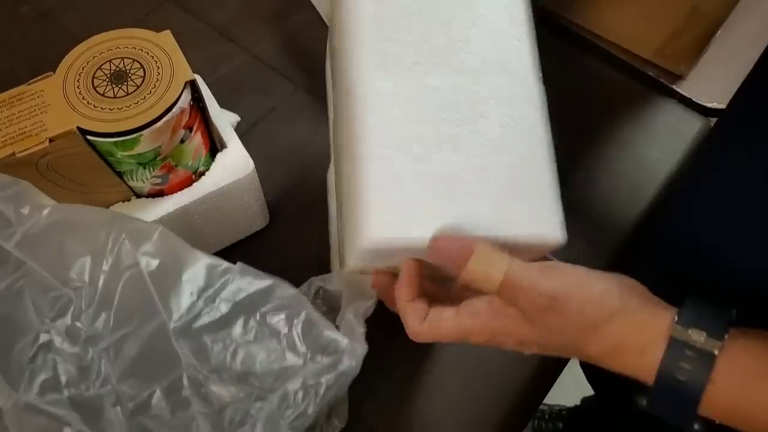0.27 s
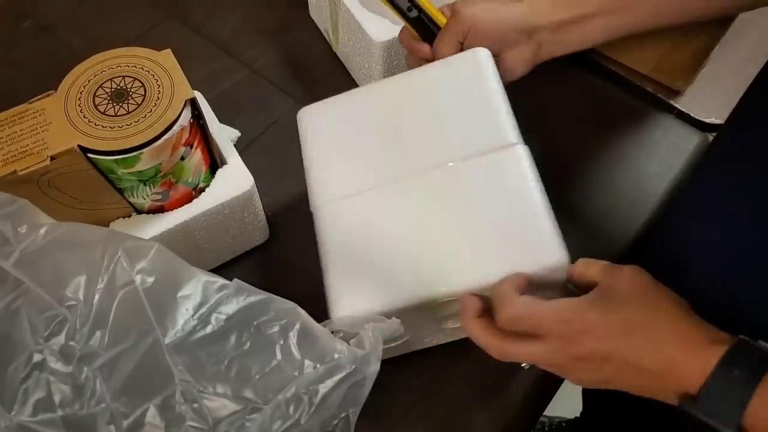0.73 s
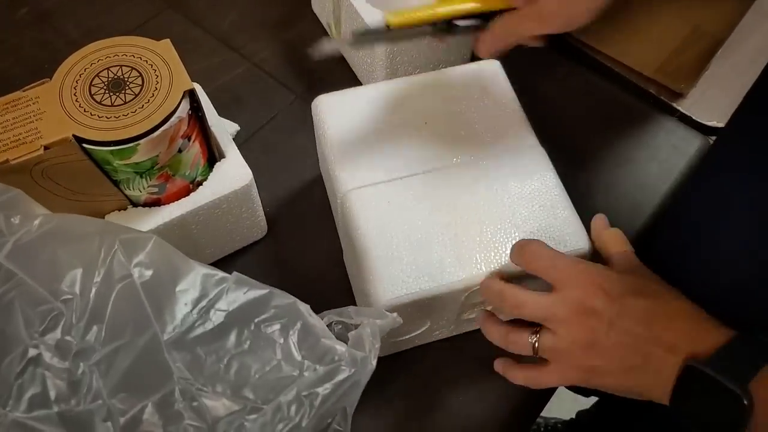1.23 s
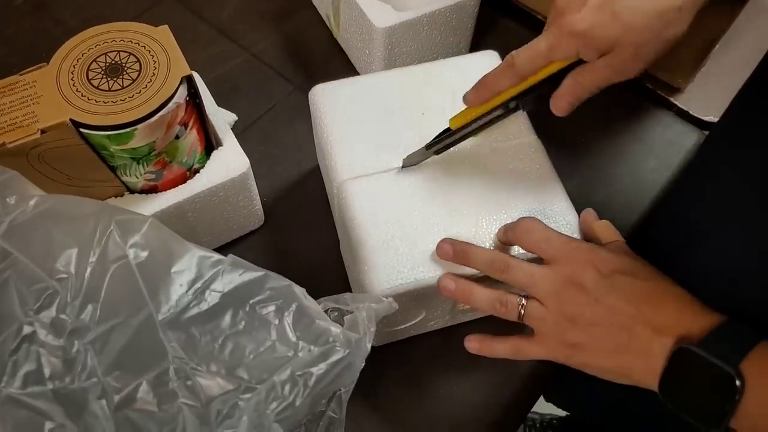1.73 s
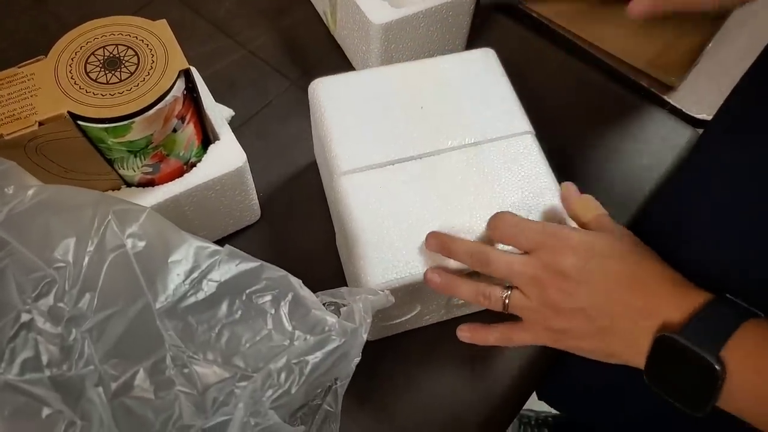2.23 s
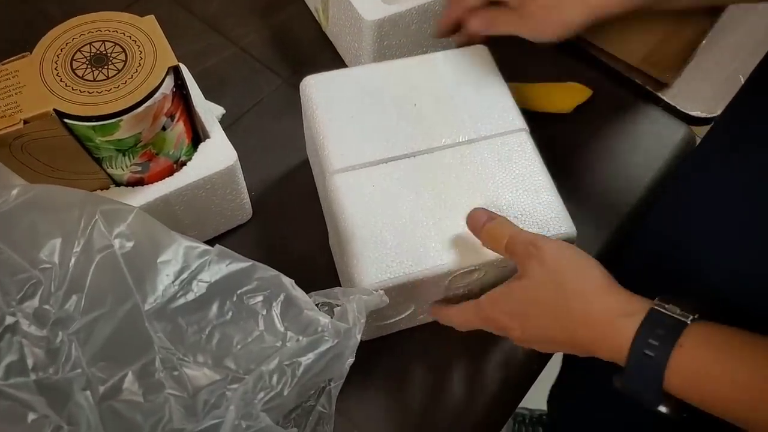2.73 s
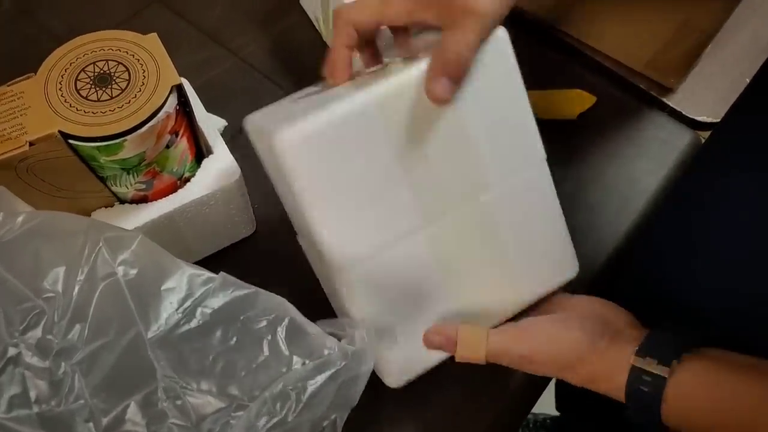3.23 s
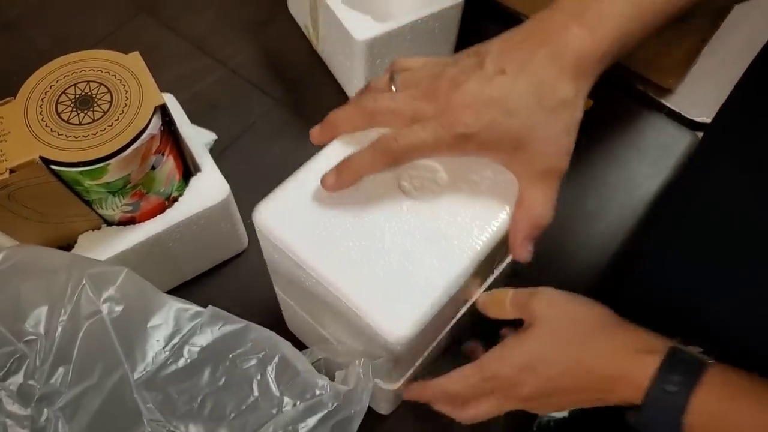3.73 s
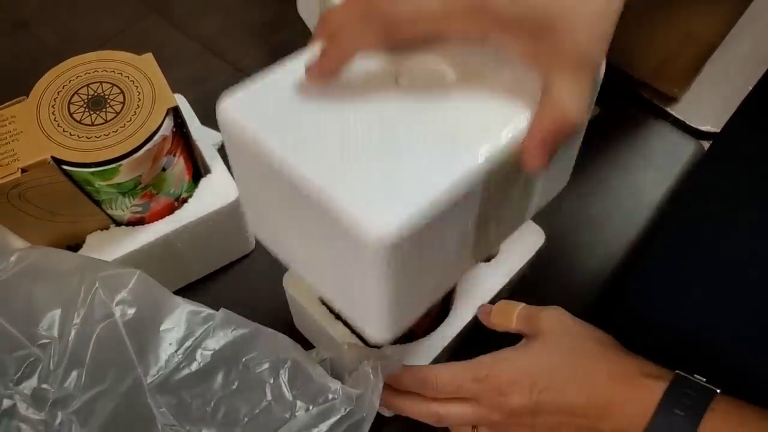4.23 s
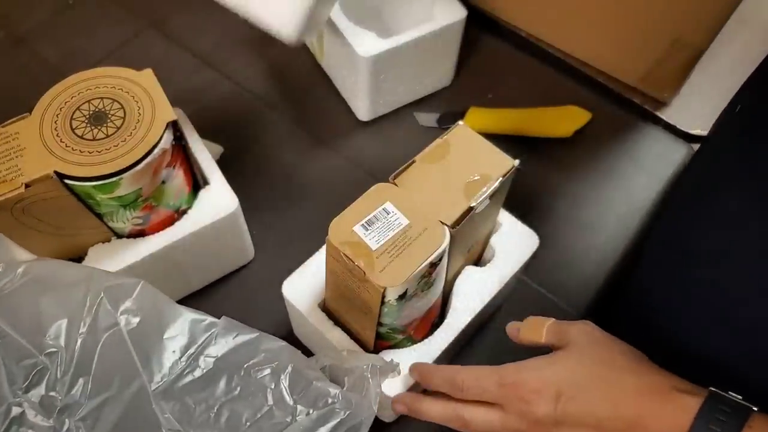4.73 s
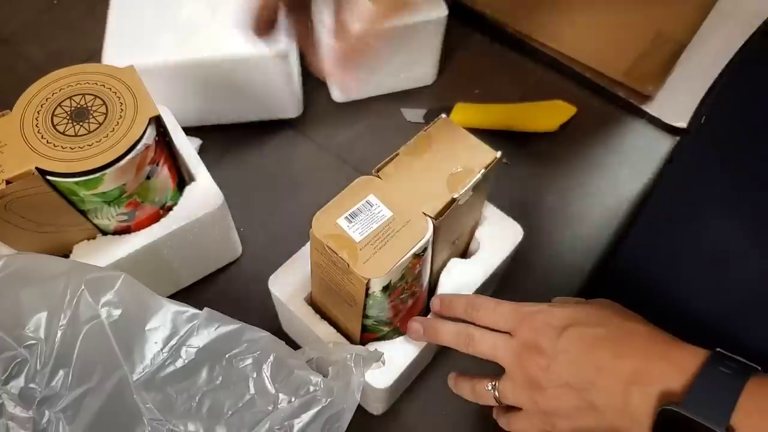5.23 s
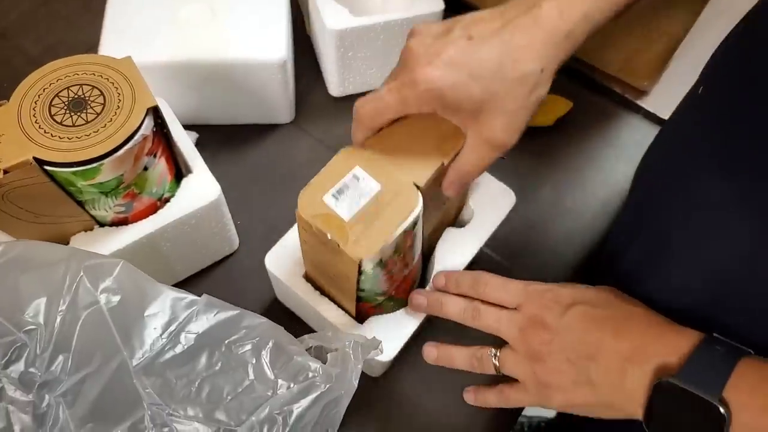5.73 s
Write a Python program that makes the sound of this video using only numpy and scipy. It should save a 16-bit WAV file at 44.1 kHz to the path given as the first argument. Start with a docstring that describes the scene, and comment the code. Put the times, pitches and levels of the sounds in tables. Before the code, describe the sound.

An unboxing heard near the microphones, slightly to the left, with a short dry room tail and faint steady room tone. Gritty foam scraping and a small chirp come first, then tiny cutting clicks, a bump and a clattering knife. Quieter fizzing rubs lead to two strong snaps as the lid opens, a quieter pause, loud hollow knocks, and finally light sliding rasps.

```python
"""A hand rubs foam with a swelling rasp, then tiny snaps: a polystyrene packing box is unpacked in a small room.
Rasp and snaps are resonant noise in three registers; squeaks, chirps and one knife ring are gliding tones.
Knocks ring the hollow box's modes and boom the table; a knife nicks the tape, drops, and its blade rings high.
At the end the lid is set down and a carton slides out of the lower half."""
import sys
import numpy as np
from scipy import signal
from scipy.fft import rfft, irfft
from scipy.io import wavfile
from scipy.ndimage import map_coordinates

SR = 44100
rng = np.random.default_rng(int(sys.argv[2]) if len(sys.argv) > 2 else 0)


def transcribe(signal):
    """Save signal, clipped to [-1, 1], as a 16-bit WAV file at the path in sys.argv[1]."""
    frames = np.atleast_2d(signal).T
    limited = np.clip(frames, -1, 1)
    pcm = np.round(limited * 32767).astype(np.int16)
    wavfile.write(sys.argv[1], SR, pcm)


N = 263935
TIME_S = np.arange(N) / SR


def from_db(db):
    """Decibels to amplitude gain."""
    return 10 ** (np.asarray(db) / 20)


def rms_one(x):
    """Scale to rms 1."""
    return x / np.sqrt(np.mean(x ** 2) + 1e-20)


def low_pass(x, hz, order=2):
    """Causal Butterworth low-pass."""
    return signal.sosfilt(signal.butter(order, np.clip(hz, 10, .45 * SR), fs=SR, output="sos"), x)


def high_pass_sos(hz, order=2):
    """Butterworth high-pass sections."""
    return signal.butter(order, hz, "high", fs=SR, output="sos")


def drift(rate_hz):
    """Smooth random signal of rms 1; the first second is dropped to let the filter settle."""
    return rms_one(low_pass(rng.standard_normal(N + SR), rate_hz)[SR:])


def colour(x, spectrum, size=2048):
    """Minimum-phase filter with the given spectrum; white noise keeps its power."""
    hz, db = np.transpose(spectrum)
    points = np.log2(hz)
    octave = np.log2(np.maximum(np.arange(size // 2 + 1) * SR / size, 10))
    outside = np.abs(octave - np.clip(octave, points[0], points[-1]))
    gain_db = np.interp(octave, points, db) - 20 * outside  # 20 dB per octave beyond the end points
    cepstrum = irfft(np.log(from_db(gain_db)))
    # folding the cepstrum onto positive time makes the phase minimal
    cepstrum[1:size // 2] *= 2
    cepstrum[size // 2 + 1:] = 0
    response = irfft(np.exp(rfft(cepstrum)))
    return signal.oaconvolve(x, response[None] / np.linalg.norm(response), axes=1)[:, :N]


def stereo_noise(alike, size):
    """White noise at two ears; alike is the shared share of power."""
    alike = np.clip(alike, 0, 1)
    shared = np.sqrt(alike) * rng.standard_normal(size)
    return shared + np.sqrt(1 - alike) * rng.standard_normal((2, size))


def panned(balance_db):
    """Left and right gains of constant power; balance is left minus right."""
    gains = from_db(np.array([[.5], [-.5]]) * balance_db)
    return gains / np.sqrt(np.mean(gains ** 2, axis=0))


def add(track, s, sound):
    """Mix a sound in at time s."""
    start = max(round(s * SR), 0)
    track[..., start:start + sound.shape[-1]] += sound[..., :N - start]


# quiet room spectrum: (frequency [Hz], relative density [dB per Hz])
ROOM_TONE = [(25, 16.5), (45, 5), (100, -4.5), (250, -19), (800, -33.5), (2500, -23), (7000, -38),
             (12000, -31), (16000, -27.5)]
ROOM_TONE_DB = -51.5


def room_tone():
    """Steady noise of the quiet room, partly shared by the ears."""
    return from_db(ROOM_TONE_DB) * colour(stereo_noise(0.69, N), ROOM_TONE)


def room(x, t60_s, wet_db, gap_s=0.0087, wall_hz=9000, bass_hz=260, size=22050):
    """A short diffuse tail, duller than the direct sound and alike at both ears in the bass."""
    t, noise = TIME_S[:size], rng.standard_normal((2, size))
    side = signal.sosfilt(high_pass_sos(bass_hz), (noise[0] - noise[1]) / 2)
    stereo = noise.mean(axis=0) + side * [[1], [-1]]
    tail = stereo * from_db(-60 * t / t60_s) * (t > gap_s)
    tail = low_pass(tail / np.linalg.norm(tail, axis=1, keepdims=True), wall_hz, order=1)
    return x + from_db(wet_db) * signal.oaconvolve(x, tail, axes=1)[:, :N]


# near surfaces: (left delay [s], right delay [s], level [dB])
MIRRORS = [(.0013, 0.0011, -17.5), (.0031, 0.0033, -12.5), (.0052, 0.0045, -13.5)]


def mirrored(x):
    """Early echoes off near surfaces ripple the spectrum, differently at each ear."""
    out = x.copy()
    for *delays_s, db in MIRRORS:
        for ear, delay_s in enumerate(delays_s):
            add(out[ear], delay_s, from_db(db) * x[ear])
    return out


# knife jolted, then dropped and bouncing: (time [s], level [dB])
KNIFE_HITS = [(2.083, -32), (2.134, -58), (2.7, -22), (2.801, -18.5)]
# blade: (frequency [Hz], relative level [dB])
BLADE_MODES = [(9540, -4), (10290, -17), (11890, -5.5), (12080, -3.5), (12630, -7), (13750, -16),
               (14200, -9.5)]
BLADE_T60_S = .2


def knife(balance_db=-4, size=13000):
    """The thin steel blade rings high after each jolt, all modes dying at one rate."""
    t, out = TIME_S[:size], np.zeros((2, N))
    for s, level_db in KNIFE_HITS:
        for hz, mode_db in BLADE_MODES:
            phase = rng.uniform(0, 2 * np.pi, (2, 1))
            envelope = from_db(level_db + mode_db - 60 * t / BLADE_T60_S)
            add(out, s, envelope * np.sin(2 * np.pi * hz * t + phase))
    return out * panned(balance_db)


# squeaks, snap chirps and a ring of the dropped knife:
# (time [s], length [s], start [Hz], end [Hz], level [dB], rms pitch waver [share])
SHORT_TONES = [(0.485, 0.058, 2210, 1438, -38.5, 0.12), (0.657, 0.067, 1494, 858, -47, 0.2),
               (0.771, 0.26, 2442, 2190, -36, 0.1), (1.026, 0.058, 1710, 1225, -51, 0.15),
               (1.22, 0.027, 2437, 2605, -27.5, 0.045), (1.647, 0.0066, 2250, 2200, -32, 0.023),
               (1.694, 0.0053, 2770, 2700, -30.5, 0.018), (1.845, .005, 2700, 2730, -27, .02),
               (2.056, 0.015, 11600, 11570, -26, .01), (2.131, 0.0067, 3510, 3390, -23.5, .02),
               (2.309, 0.0083, 3220, 3500, -30, .02), (2.398, 0.0064, 2480, 2110, -26, 0.016),
               (2.695, 0.1, 2460, 2547, -30, 0.01), (3.603, 0.0339, 2390, 2250, -39, .02),
               (5.405, 0.014, 1600, 1460, -27, 0.041)]


def short_tones(waver_hz=400, rough_db=3.5, balance_db=-5):
    """Short, rough tones of gliding pitch: squeaks, chirps and the knife's ring."""
    out = np.zeros(N)
    bend, rough = drift(waver_hz), from_db(rough_db * drift(waver_hz))
    for s, length_s, start_hz, end_hz, db, waver in SHORT_TONES:
        span = slice(round(s * SR), round((s + length_s) * SR))
        glide_hz = np.linspace(start_hz, end_hz, len(bend[span]))
        hz = glide_hz * (1 + waver * bend[span])
        tone = np.sin(2 * np.pi * np.cumsum(hz) / SR) * rough[span]
        add(out, s, from_db(db) * tone * signal.windows.tukey(len(tone), .5))
    return out * panned(balance_db)


def resonant_noise(depth_db, width_hz, hold_s, alike, size=256):
    """Noise through foam: broad resonances come and go as the grip and touching spot change."""
    hz, s, frames = signal.stft(stereo_noise(alike, N), SR, nperseg=2 * size)
    where = np.meshgrid(hz / width_hz, s / hold_s, indexing="ij")
    peaks = map_coordinates(rng.standard_normal((size, size)), where, order=1, mode="mirror")
    shaped = frames * from_db(depth_db * np.clip(peaks, -2, 2))
    return rms_one(signal.istft(shaped, SR)[1][:, :N])


def slip_power(per_s, size_db, t60_s):
    """Power of random slips of uneven size, each dying away; mean 1."""
    sizes = from_db(size_db * np.minimum(rng.exponential(1, N), 3))
    slips = (rng.random(N) < per_s / SR) * sizes
    decay = from_db(-60 / (t60_s * SR)) ** 2
    power = signal.lfilter([1], [1, -decay], slips ** 2 + 1e-12)
    return power / power.mean()


# hand or lid sliding on foam: (time [s], length [s], level [dB], swell over stroke [dB],
# bead fizz re rasp [dB])
STROKES = [(0, 0.14, -36.5, 14, 0), (0.164, 0.031, -25.5, -1.5, 0.5), (0.201, .04, -28, -6, -1.5),
           (0.257, .028, -26, 0, -3.5), (0.308, 0.24, -34, 0.5, 0), (0.58, 0.11, -42, -0.5, 0.5),
           (0.779, 0.2, -34.5, -2, 2), (1.005, 0.094, -36, -4.5, -10), (1.123, 0.25, -47, -3, 3.5),
           (1.464, 0.11, -55, -1, -4), (1.595, 0.016, -29, -3, -3), (1.841, 0.14, -41, 0, 0.5),
           (2.008, 0.082, -27.5, 6.5, -2.5), (2.216, 0.18, -60.5, 5.5, 7), (2.497, 0.015, -66.5, -8, 17),
           (2.552, 0.021, -60, 3, 14.5), (2.632, 0.01, -28.5, -7.5, -2), (2.706, 0.015, -20.5, -5, 1),
           (2.729, 0.056, -32.5, -9, 1.5), (2.811, 0.098, -35, -18, -1.5), (3.013, 0.15, -51, -9, -1),
           (3.157, 0.34, -42.5, 0.5, 7.5), (3.53, 0.16, -38.5, -2.5, 6.5), (3.71, 0.2, -39.5, 4, 5),
           (3.967, .13, -45, 0, 2.5), (4.158, .1, -33, -6.5, 4.5), (4.323, 0.063, -31.5, -7.5, 7),
           (4.593, 0.2, -54, 1.5, 1.5), (4.919, 0.11, -46.5, -7, -6), (5.074, 0.08, -47, -12.5, 1.5),
           (5.203, .13, -41, -9, -4.5), (5.421, 0.15, -45, -19.5, -1.5), (5.597, 0.047, -38.5, -7.5, -15.5),
           (5.672, 0.057, -33.5, 3.5, 3), (5.743, .08, -42.5, 0.5, 12), (5.842, 0.068, -29, -0.5, 6),
           (5.92, 0.084, -35, -9.5, -3)]
# edge time constants: fixed part [s] plus share of stroke length
STROKE_RISE_S, STROKE_RISE_SHARE = .004, 0.17
STROKE_STOP_S, STROKE_STOP_SHARE = 0.0062, 0.066


def stroke_power():
    """Each stroke gathers speed, swells or eases, and stops: power of the rasp and of its fizz."""
    rasp, fizz = np.zeros((2, N))
    for s, length_s, level_db, swell_db, fizz_db in STROKES:
        early = np.maximum(s - TIME_S, 0) / (STROKE_RISE_S + STROKE_RISE_SHARE * length_s)
        late = np.maximum(TIME_S - s - length_s, 0) / (STROKE_STOP_S + STROKE_STOP_SHARE * length_s)
        edges = np.exp(-np.minimum(early + late, 20))
        progress = np.clip((TIME_S - s) / length_s, 0, 1)
        power = (from_db(level_db + swell_db * (progress - .5)) * edges) ** 2
        rasp += power
        fizz += power * from_db(fizz_db) ** 2
    return rasp, fizz


# foam registers, low to high, for rubbing and snaps: (frequency [Hz], relative density [dB per Hz])
BODY = [(120, 3), (300, -3), (520, -2.5), (750, -4), (1000, -5), (1300, -1.5), (1900, -18)]
RING = [(800, -29.5), (1300, -8.5), (1800, -1), (2300, 3.5), (2900, -1.5), (4300, -7), (6000, -11)]
FIZZ = [(3200, -2.5), (4700, -1), (6500, -3.5), (8300, -1), (10400, -4), (11700, 6.5), (12800, -0.5),
        (14200, -1), (15500, -9)]


def rubbing(judder_db=0.66, judder_hz=40, body_db=-10.0, ring_db=-3, fizz_db=-2, balance_db=-4.5):
    """Beads catch and let go: a fine rasp with coarser ticks in it, under a juddering grip."""
    power, fizz_power = stroke_power()
    ticks = .45 * slip_power(per_s=130, size_db=2.5, t60_s=.009)
    judder = from_db(judder_db * drift(judder_hz))
    grain = rms_one(np.sqrt(1 + ticks) * judder) * panned(balance_db)
    foam = resonant_noise(depth_db=5.5, width_hz=190, hold_s=.06, alike=0.18)
    registers = [(BODY, body_db, power), (RING, ring_db, power), (FIZZ, fizz_db, fizz_power)]
    out = np.zeros((2, N))
    for k, (spectrum, db, drive) in enumerate(registers):
        noise = np.roll(foam, k * SR, axis=1)  # 1 s shifts keep the registers independent
        out += colour(grain * np.sqrt(drive) * from_db(db) * noise, spectrum)
    return out


# foam, tape and blade snaps: (time [s], level [dB], body re level [dB], bead fizz re level [dB])
SNAPS = [(.057, -36.5, -20, -4), (0.101, -36.5, -2, 4), (0.161, -28, -12, 5), (.178, -23, -13.5, -1),
         (0.2153, -26, -19, 4), (.327, -38, -14, 12), (0.625, -36.5, -28, 13), (.659, -42.5, -20, 10),
         (0.7516, -23, -7.5, 2.5), (.769, -22, -3.5, 0), (.846, -31, -25, 10.5), (1.083, -32, -18, -15),
         (1.166, -30, -14, 9), (1.22, -31.5, -16, 4), (1.461, -33.5, -13.5, 9), (1.587, -25, -12, 0.5),
         (1.605, -23.5, -17, -5.5), (1.6446, -25.5, -20, -7), (1.696, -41, 2, -9), (1.848, -35, -2, -10),
         (1.9093, -24.5, -5, -2.5), (2.074, -34, 12, 14), (2.0795, -29.5, 13.5, 14.5),
         (2.1329, -28.5, -23, 3), (2.188, -45, -22, -17), (2.306, -34, -41, 1), (2.399, -28, -46, 2.5),
         (2.5409, -42, -30, 1), (2.698, -19, -2, 2), (2.702, -20, -5, 2), (2.801, -37.5, 13, 0),
         (2.9736, -35, -32, 3), (3.017, -44.5, 3, 3), (3.394, -30.5, -9.5, -16), (3.5263, -16.5, -5.5, -2),
         (3.638, -24, -4.5, 2.5), (3.729, -29.5, 0, -1), (3.807, -23, -15, 3.5), (3.9076, -33.5, -16, 5),
         (3.9257, -28.5, -8.5, 2), (3.9858, -31, -3, 14.5), (4.1174, -15.5, -19, 2),
         (4.8898, -34, -5.5, -2), (4.982, -39, -17, -12), (5.0094, -48.5, 1, 9.5), (5.198, -34.5, -11, 8),
         (5.243, -25.5, -6, -9), (5.3591, -27.5, -2, -11), (5.4089, -24.5, -9, -3), (5.44, -39.5, 9.5, -12)]
SNAP_T60_S, SNAP_RISE_S = 0.032, 0.00059  # t60 at 0 dB fizz
SNAP_HALVING_DB = 32  # this much more fizz halves the t60


def snaps(body_linger=1.26, body_db=1.3, ring_db=2.5, fizz_db=1.5, balance_db=-6, size=4096):
    """A sudden slip shakes the foam's dense, well-damped modes; the low ones last longer."""
    t, envelopes = TIME_S[:size], np.zeros((3, N))
    rise = 1 - np.exp(-t / SNAP_RISE_S)
    for s, level_db, body, fizz in SNAPS:
        t60_s = SNAP_T60_S * 2 ** (-fizz / SNAP_HALVING_DB)
        levels_db = (body + body_db, ring_db, fizz + fizz_db)
        decays_s = (t60_s * body_linger, t60_s, t60_s)
        for track, db, decay_s in zip(envelopes, levels_db, decays_s):
            add(track, s - SNAP_RISE_S, rise * from_db(level_db + db - 60 * t / decay_s))
    foam = resonant_noise(depth_db=6.5, width_hz=180, hold_s=.12, alike=.15)
    foam = np.sqrt(2) * foam * panned(balance_db)
    out = np.zeros((2, N))
    for k, spectrum in enumerate((BODY, RING, FIZZ)):
        out += colour(envelopes[k] * np.roll(foam, k * SR, axis=1), spectrum)
    return out


# box bumps: (time [s], box level [dB], table boom level [dB], contact low-pass [Hz], hand grip [0-1])
KNOCKS = [(.496, -30, -56, 900, 0.56), (.746, -22, -57, 450, 0.95), (.769, -21, -22, 600, 0.52),
          (1.016, -23.5, -30.5, 1010, 0.66), (1.606, -39, -55, 1500, 0.52), (1.65, -29, -52, 1000, .6),
          (1.9, -25, -41, 1100, .6), (2.079, -18, -46, 1200, 0.89), (2.0903, -11.5, -42, 1300, .5),
          (2.11, -22, -34.5, 950, 0.97), (2.632, -42.5, -37, 700, 0), (2.697, -7.5, -35, 1500, 0.37),
          (2.7013, -12.5, -40, 1200, 0.29), (2.72, -12.5, -24, 790, 0.34),
          (2.804, -15.5, -35.5, 1500, 0.11), (2.877, -26.5, -37.5, 940, 0.24),
          (3.02, -32, -40.5, 450, 0.79), (3.526, -41, -52, 1200, 0.5), (3.607, -22.5, -31, 450, 1),
          (3.727, -33, -31, 500, 0), (3.803, -21, -38, 450, 0.78), (4.118, -23, -39, 1200, 0.39),
          (4.314, -21.5, -39.5, 500, 0.9), (4.885, -33, -37, 700, 0.53), (5.012, -40.5, -42, 600, 0.47),
          (5.196, -12.5, -22, 500, 0.56), (5.214, -12.5, -27, 420, 0.73), (5.241, -2.5, -24, 550, 0),
          (5.2615, -19, -43, 550, 0.1), (5.2757, -11, -20.5, 500, 0.42), (5.3203, -14, -36, 420, 0.04),
          (5.3586, -5, -33, 698, 0), (5.395, -8.5, -26, 420, 0.59), (5.409, -13.5, -46, 800, 0.42),
          (5.437, -23, -40, 1000, .2)]
# hollow box, ungripped: (frequency [Hz], relative level [dB], t60 [s])
BOX_MODES = [(150.7, -13, 0.39), (188, -9.5, 0.17), (246.8, -8.5, 0.23), (289.3, -3, 0.15),
             (310, -13.5, 0.19), (366, 1, .18), (485, -1, .11), (560, -7, .13), (720, -11.5, .11),
             (860, -28, 0.054), (960, -18, 0.12), (1234, -12.5, 0.18), (1370, -5, 0.041), (1860, -7, 0.13)]
# table top, box ungripped: (frequency [Hz], relative level [dB], t60 [s])
TABLE_MODES = [(73.6, 1, 0.65), (86.4, -15, 0.71), (112.8, -10.5, 0.35)]
# at full grip: share taken off box pitch, share added to damping
GRIP_PITCH_DROP, GRIP_DAMPING = 0.389, 1.13


def knocks(scatter_db=2.05, ear_turn_hz=600, thud_db=-4.5, thud_t60_s=0.097, balance_db=-2.2, size=13000):
    """Each bump rings the box and booms the table; soft contacts dull it, grip shortens it."""
    t, out = TIME_S[:size], np.zeros((2, N))
    hz, mode_db, t60_s = np.transpose(BOX_MODES)[:, :, None]
    sign = (-1) ** np.arange(len(hz))[:, None]  # neighbouring modes push the air in opposite directions
    turn = sign * (hz / ear_turn_hz) ** 2 / 2  # short waves reach the ears further out of step
    ears = panned(balance_db)
    for s, level_db, boom_db, soft_hz, grip in KNOCKS:
        grip = np.clip(grip, 0, 1)
        pitch = 1 - GRIP_PITCH_DROP * grip ** 2
        ring = 1 / (1 + GRIP_DAMPING * grip)
        age = t[t < ring * t[-1]]
        fall_db = -60 * age / ring  # divided by each t60 below

        scattered_db = mode_db + scatter_db * rng.standard_normal(hz.shape)
        strength = sign * from_db(scattered_db + fall_db / t60_s)
        phase = 2 * np.pi * hz * pitch * age
        box = np.array([np.sum(strength * np.sin(phase + side * turn), axis=0) for side in (1, -1)])

        # beads crush at the contact: a dull, toneless thud
        thud = from_db(thud_db + fall_db / thud_t60_s) * stereo_noise(0.89, len(age))
        boom = np.zeros(len(age))
        for table_hz, db, decay_s in TABLE_MODES:
            boom += from_db(boom_db + db + fall_db / decay_s) * np.sin(2 * np.pi * table_hz * age)

        bump = from_db(level_db) * (box / 2 + 2 * thud) * ears + boom
        # starting half a low-pass period early keeps each bump's peak at its listed time
        add(out, s - .5 / soft_hz, -low_pass(bump, soft_hz))
    return out


def scene():
    """Foam, knife and box in the room, over the quiet background."""
    foam = from_db(0.11) * mirrored(rubbing() + snaps())
    handling = room(foam + short_tones() + knife(), t60_s=0.11, wet_db=-11.5)
    bumps = room(knocks(), t60_s=0.23, wet_db=-15.5)
    return handling + bumps + room_tone()


def close_pair(x, apart_hz=170):
    """Two microphones close together hear the long waves alike."""
    side = signal.sosfiltfilt(high_pass_sos(apart_hz), (x[0] - x[1]) / 2)
    return x.mean(axis=0) + side * [[1], [-1]]


def record(dry, bass_cut_hz=52, top_cut_hz=15600, limit=1.1):
    """The microphones thin the lowest bass, the highest peaks are rounded and the top is cut."""
    thinned = signal.sosfilt(high_pass_sos(bass_cut_hz, order=3), close_pair(dry))
    rounded = limit * np.tanh(thinned / limit)
    top_cut = signal.ellip(10, .1, 90, top_cut_hz, fs=SR, output="sos")
    return signal.sosfilt(top_cut, rounded)


dry = scene()
out = record(dry)
transcribe(out)
```